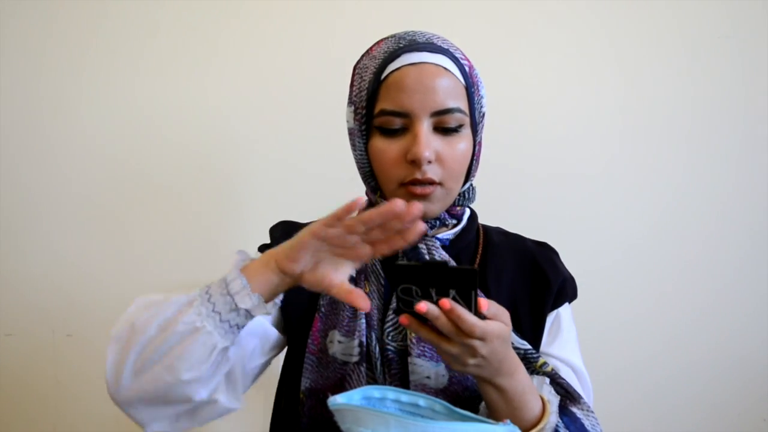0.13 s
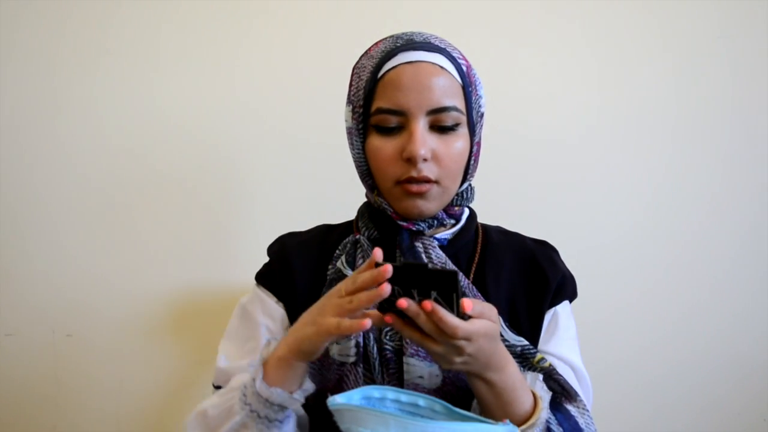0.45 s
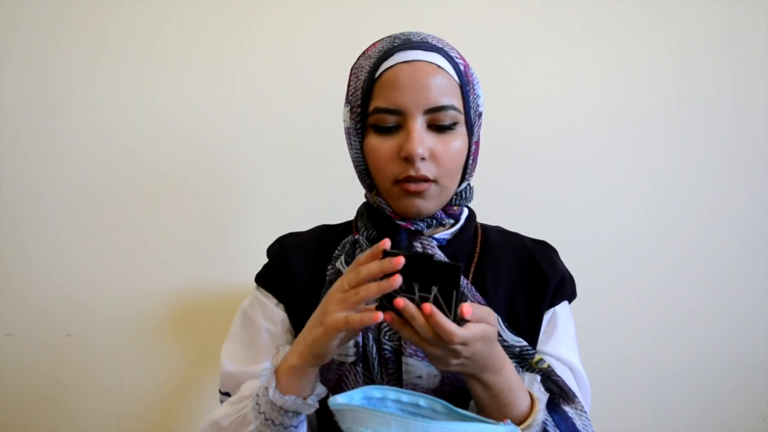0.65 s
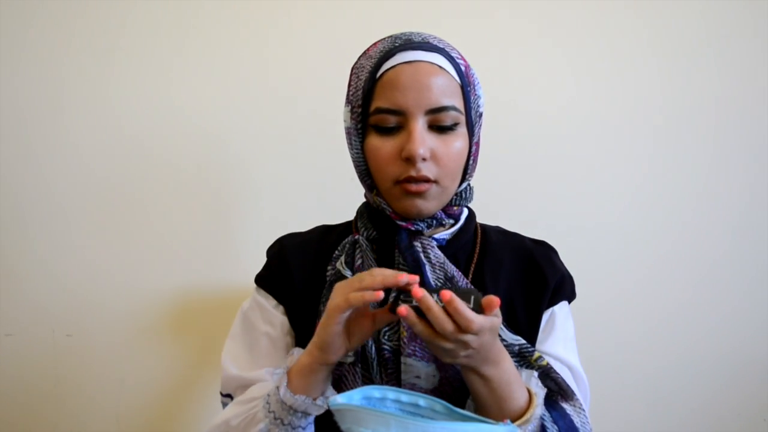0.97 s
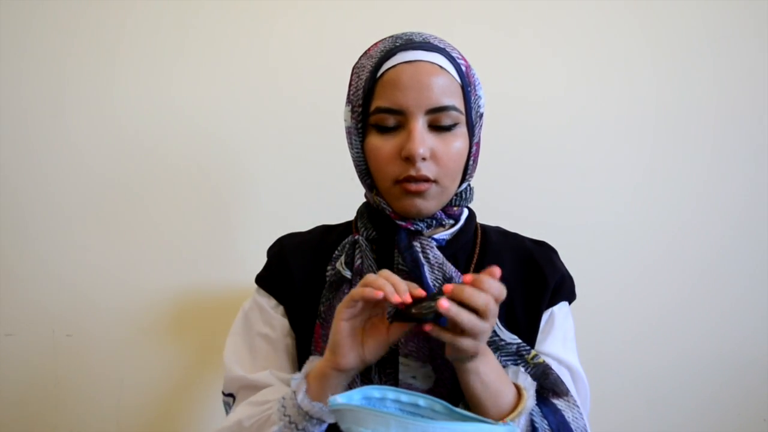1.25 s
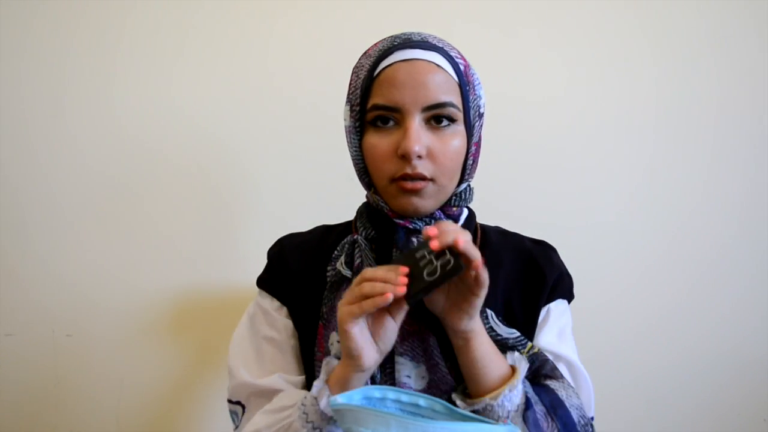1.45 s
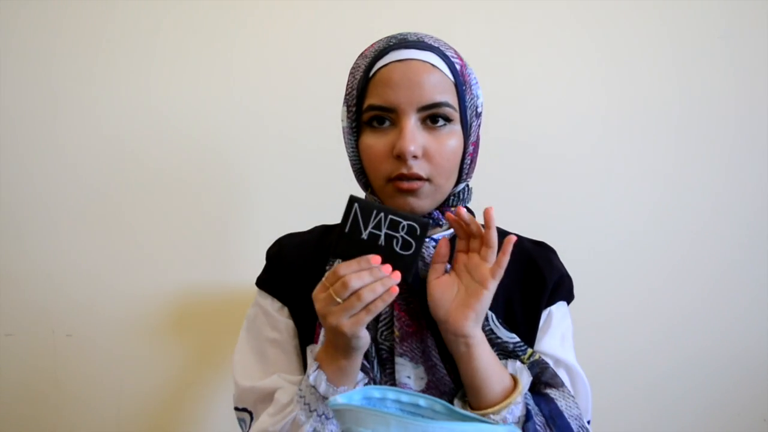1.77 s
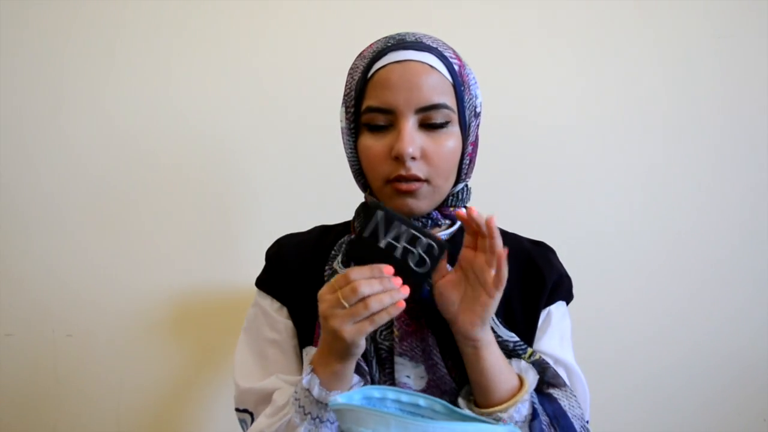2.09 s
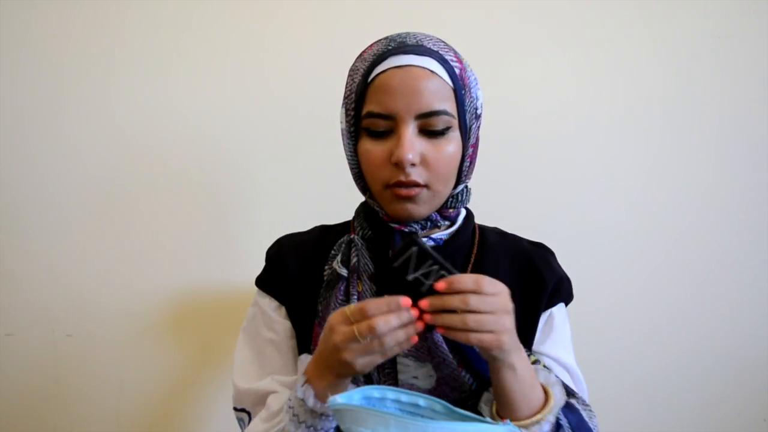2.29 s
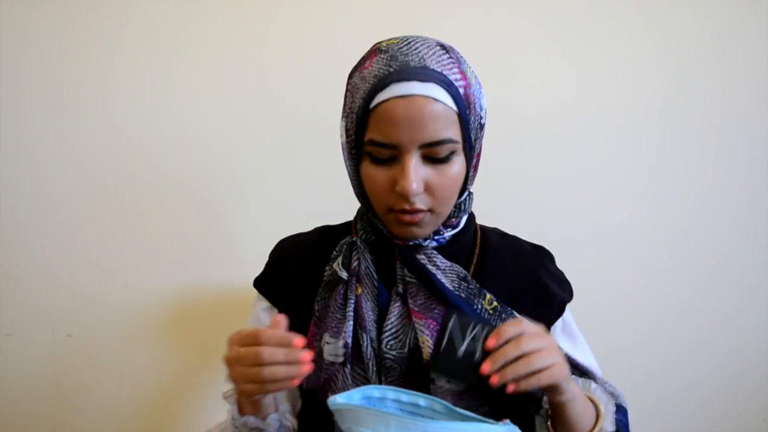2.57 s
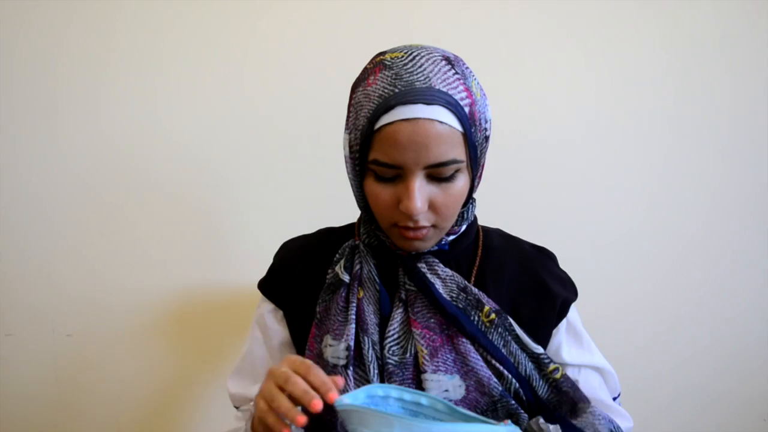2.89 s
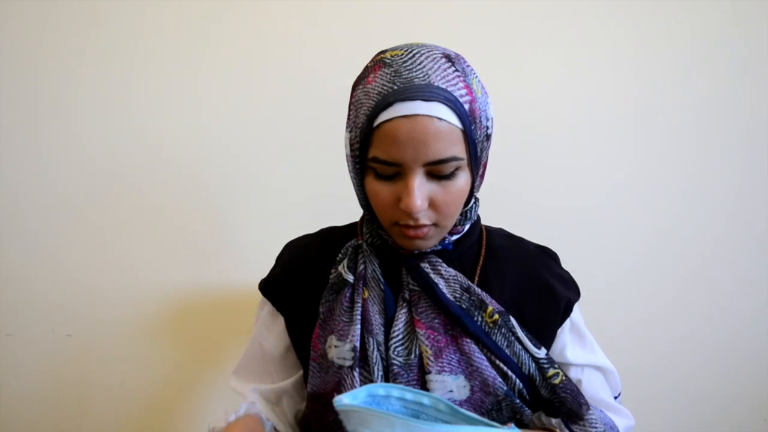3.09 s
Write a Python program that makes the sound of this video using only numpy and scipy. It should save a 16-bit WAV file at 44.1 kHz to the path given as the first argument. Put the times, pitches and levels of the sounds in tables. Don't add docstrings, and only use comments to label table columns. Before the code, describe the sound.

Near-quiet hiss with a faint finger touch, a loud bright plastic lid snap, then a short double knock as the case drops among others; lively bare room, close distorting camera microphone.

```python
import sys
import numpy as np
from scipy import signal
from scipy.fft import rfft, irfft
from scipy.io import wavfile

SR = 44100
rng = np.random.default_rng(int(sys.argv[2]) if len(sys.argv) > 2 else 0)


def level_to_linear(level):
    exponent = np.asarray(level, float) / 20
    return 10 ** exponent


def inscribe(sig):
    pcm = np.round(np.clip(np.atleast_2d(sig).T, -1, 1) * 32767)
    wavfile.write(sys.argv[1], SR, pcm.astype(np.int16))


N = 143325

# (time [s], level [dB], crack share [0-1])
SNAP_CONTACTS = [(1.9563, -43, 0.9), (1.9602, -16.5, 0.5), (1.968, -14, .6), (1.971, -3.5, 1),
                 (1.975, -4.5, 0.4), (1.979, -1, 0.35), (1.9868, -2, 0.55), (1.991, -3.5, 0.65),
                 (1.9975, -7, .7), (2.002, -3, 0.51), (2.009, -5.5, .5)]
# (frequency [Hz], level [dB], t60 [s])
LID_MODES = [(811, -8.5, 0.053), (1050, -33, 0.014), (1510, -26, 0.023), (2000, -5, 0.044),
             (2083, -5, 0.022), (2820, -14, 0.0076), (3720, -3.5, 0.016), (4640, -15, 0.0046)]
# (frequency [Hz], density [dB per Hz])
CRACK_SPECTRUM = [(450, -53), (800, -8.5), (2100, -1), (4500, -1), (5600, -2.5), (11000, -3),
                  (13300, -16.5), (15600, -32)]
# (time [s], depth [dB], length [s])
SNAP_PULL_DOWN = (2.173, 5.45, .018)

# (time [s], level [dB], shell share [0-1])
POUCH_KNOCKS = [
    (2.9585, 9, 0.54),
    (2.9596, 8.5, 0.23),
    (2.9726, -14, 0.3),
    (2.9945, -9, 0),
]
# (frequency [Hz], level [dB], t60 [s])
BODY_MODES = [(356.4, -20, 0.066), (497, -18.5, 0.047), (650, -8.5, 0.014), (829, -7, 0.013),
              (1066, -1, 0.0071), (1266, -4, 0.01), (1470, -6, 0.014)]
# (frequency [Hz], level [dB], t60 [s])
SHELL_MODES = [(2330, 0, 0.008), (2748, -2, 0.0074), (3800, -10.5, 0.0072), (4930, -16.5, 0.0039)]
# (frequency [Hz], level [dB], t60 [s])
RIM_MODES = [(3820, -12.5, 0.0095), (4980, -8.5, 0.0086), (5500, -15.5, 0.0066), (6260, -17, .008),
             (7060, -27, 0.0068), (9200, -24, .004), (10600, -19.5, .004), (11800, -31, 0.0038)]
# (frequency [Hz], level [dB], t60 [s])
TICK_MODES = [(2530, -0.5, 0.0088), (2890, -3, 0.0067)]
# (time [s], depth [dB], length [s])
KNOCK_PULL_DOWN = (3.135, 13, 0.045)

# (time [s], level [dB], pitch [Hz])
FINGER_TAPS = [
    (.848, -31, 1190),
    (.859, -30, 1255),
    (0.8634, -29.5, 1314),
    (0.873, -37, 1470),
    (.882, -34.5, 2000),
    (0.895, -53, 1310),
    (.875, -52, 5950),
    (.879, -48, 8300),
]

# (frequency [Hz], t60 [s])
ROOM_T60 = [(200, .2), (500, 0.27), (1000, 0.36), (2000, 0.56), (4000, 0.54), (8000, 0.42), (11500, 0.35),
            (13000, 0.14)]
# (frequency [Hz], likeness [0-1])
ROOM_LIKENESS = [(100, 0.99), (1000, 1), (3000, .98), (5500, 1), (8500, 0.18), (13000, 0.087)]

# (frequency [Hz], density [dB per Hz])
HISS_SPECTRUM = [(18, -80), (30, -77), (88, -29), (192, -3.5), (388, -1), (1260, 0), (8040, -15.5),
                 (11600, -26), (15400, -44)]
# (frequency [Hz], likeness [0-1])
HISS_LIKENESS = [(60, 0.74), (180, 0.91), (550, 0.59), (1650, 0.26), (4970, 0.07), (15000, 0.05)]
# (frequency [Hz], left minus right [dB])
HISS_LEAN = [(60, 0.43), (380, 0.5), (2380, 0.1), (15000, 0.5)]
# (time [s], gain [dB])
GAIN_DRIFT = [
    (0, -1),
    (.4, 0),
    (1, .5),
    (1.7, 0),
    (2.3, 1.5),
    (2.9, -1.5),
    (3.049, -1),
    (3.15, -5.5),
    (3.25, -0.5),
]
# (centre [Hz], width [Hz], level [dB])
HUM_BANDS = [(105, 38, -68), (228, 93, -60.5), (855, 310, -57.5)]


def snap():
    crack_t60_s, chatter_db, chatter_t60_s = 0.0033, -15.5, 0.031
    out = np.zeros((4, N))
    t = np.arange(512) / SR
    colour = level_to_linear(read(CRACK_SPECTRUM, np.fft.rfftfreq(512, 1 / SR)))
    decay = level_to_linear(-60 * t / crack_t60_s) + level_to_linear(chatter_db - 60 * t / chatter_t60_s)
    for k, (s, db, bright) in enumerate(SNAP_CONTACTS):
        row = out[k % len(out)]
        crack = evened(irfft(rfft(rng.standard_normal(512)) * colour)) * decay
        add(row, s, level_to_linear(db) * bright * crack)
        add(row, s, level_to_linear(db - 9.5) * (1 - bright) * ring(LID_MODES, 0.025, 0.0001))
    return placed(out, 4.5, 8.5, 1.5, SNAP_PULL_DOWN)


def knock():
    room_db, rim_dry_db, tick_s = -6.5, -15.5, 3.0068
    out = np.zeros((2, N))
    for k, (s, db, high) in enumerate(POUCH_KNOCKS):
        body = (1 - high) * ring(BODY_MODES, 0.032, 0.00042)
        shell = high * ring(SHELL_MODES, 0, 0.00059)
        add(out[k % len(out)], s, level_to_linear(db) * (body + shell))
    add(out[0], tick_s, ring(TICK_MODES, 0, 0.0015))
    rim = np.zeros((1, N))
    add(rim[0], POUCH_KNOCKS[0][0], ring(RIM_MODES, 0, 0.0003))
    blows = placed(out, -1, room_db, 0.8, KNOCK_PULL_DOWN)
    return blows + placed(rim, rim_dry_db, room_db, 0, KNOCK_PULL_DOWN)


def handling():
    out = np.zeros((1, N))
    for s, db, hz in FINGER_TAPS:
        modes = [(hz, db, 0.021), (hz * 1.55, db - 3.5, 0.015)]
        add(out[0], s, ring(modes, 0.01, 0.00077))
    no_pull_down = (1, 0, 1)
    return placed(out + skin_rub(), 0, -7, 0, no_pull_down)


def skin_rub():
    centre_s, length_s, level_db, band_hz = 0.868, 0.026, -47, [1000, 4440]
    rub = signal.lfilter(*signal.butter(2, band_hz, "band", fs=SR), rng.standard_normal(N))
    stroke = np.exp(-((np.arange(N) / SR - centre_s) / length_s) ** 2)
    return level_to_linear(level_db) * evened(rub) * stroke * (stroke > 1e-4)


def ring(modes, detune, rise_s):
    t = np.arange(3000) / SR
    tune = 1 + detune * rng.standard_normal(len(modes))
    out = np.zeros(len(t))
    for (hz, db, t60_s), k in zip(modes, tune):
        out += level_to_linear(db - 60 * t / t60_s) * np.sin(2 * np.pi * hz * k * t)
    return (1 - np.exp(-t / rise_s)) * out


def placed(rows, dry_db, room_db, pan_db, pull_down):
    low_cut = signal.butter(3, 400, "high", fs=SR, output="sos")
    rows = signal.sosfilt(low_cut, rows)
    s, depth_db, length_s = pull_down
    closing = 0.5 + 0.5 * np.tanh((np.arange(N) / SR - s) / length_s)
    direct = rows.sum(0) * level_to_linear(dry_db + pan_db * np.array([[0.5], [-0.5]]))
    return direct + level_to_linear(room_db) * level_to_linear(-depth_db * closing) * sum(map(room, rows))


def room(x):
    start_s, rise_s = 0.0034, 0.004
    far_db, far_t60_s, far_top_hz = -20, 2.82, 3070
    spike_db, spike_t60_s, spike_most = 2.5, 0.3, 4
    t = np.arange(SR // 64) * 64 / SR

    def decay(hz):
        hz = hz[:, None]
        near = level_to_linear(-60 * t / read(ROOM_T60, hz))
        far = level_to_linear(far_db - 60 * t / far_t60_s) / (1 + (hz / far_top_hz) ** 2)
        return near + far

    tail = stereo_noise(len(t), 256, ROOM_LIKENESS, decay)
    after_s = np.arange(tail.shape[1]) / SR - start_s
    spikes = np.minimum(rng.exponential(1, tail.shape[1]), spike_most)
    spikes = level_to_linear(spike_db * level_to_linear(-20 * after_s / spike_t60_s) * spikes)
    tail = tail * np.clip(after_s / rise_s, 0, 1) * spikes
    tail = tail / np.linalg.norm(tail[0])
    start = np.argmax(x != 0)
    wet = signal.fftconvolve(x[None, start:start + SR // 4], tail, axes=1)
    return np.pad(wet, ((0, 0), (start, N)))[:, :N]


def stereo_noise(frames, size, likeness, gain):
    hz = np.fft.rfftfreq(size, 1 / SR)
    a, b, c, d = rng.standard_normal((frames, len(hz), 4)).T
    like = np.sqrt(np.clip(read(likeness, hz), 0, 1))[:, None]
    mid = (a + 1j * b) * np.sqrt(1 + like)
    side = (c + 1j * d) * np.sqrt(1 - like)
    spectra = np.array([mid + side, mid - side]) * gain(hz)
    return signal.istft(spectra, nperseg=size, noverlap=size * 3 // 4)[1]


def evened(x):
    return x / np.sqrt(np.mean(x ** 2) + 1e-20)


def read(points, hz):
    f, value = np.transpose(points)
    return np.interp(np.log(hz + 1), np.log(f + 1), value)


def add(mix, s, sound):
    part = mix[round(s * SR):][:len(sound)]
    part += sound[:len(part)]


def hiss():
    def shape(hz):
        lean = level_to_linear(read(HISS_LEAN, hz) / 2)
        return (level_to_linear(read(HISS_SPECTRUM, hz)) * np.array([lean, 1 / lean]))[..., None]

    noise = stereo_noise(N // 256 + 5, 1024, HISS_LIKENESS, shape)[:, :N]
    return level_to_linear(-45.5) * evened(noise)


def building_hum():
    out = np.zeros(N)
    for hz, width_hz, db in HUM_BANDS:
        band = signal.butter(2, [hz - width_hz / 2, hz + width_hz / 2], "band", fs=SR)
        out += level_to_linear(db) * evened(signal.lfilter(*band, rng.standard_normal(N)))
    return out


def scene():
    gain_db = np.interp(np.arange(N) / SR, *np.transpose(GAIN_DRIFT))
    background = (hiss() + building_hum()) * level_to_linear(gain_db)
    return snap() + knock() + handling() + background


def roll_off(x):
    return signal.sosfilt(signal.butter(12, 15600, fs=SR, output="sos"), x)


def record(dry):
    ceiling = 0.97
    mix = np.clip(dry, -ceiling, ceiling)
    return roll_off(mix)


dry = scene()
out = record(dry)
inscribe(out)
```